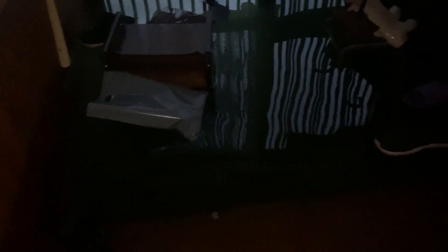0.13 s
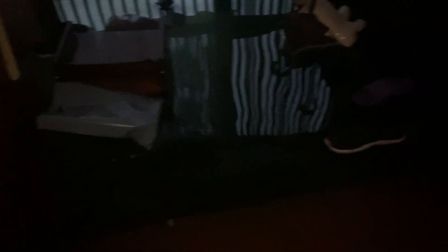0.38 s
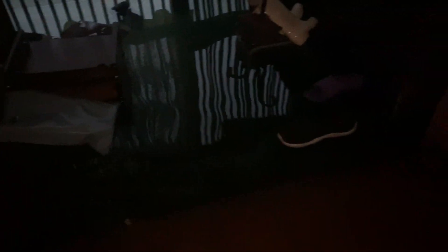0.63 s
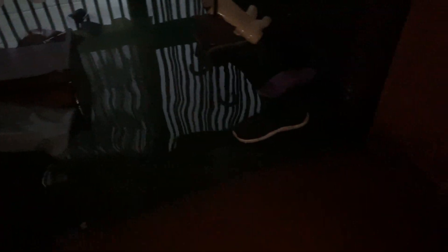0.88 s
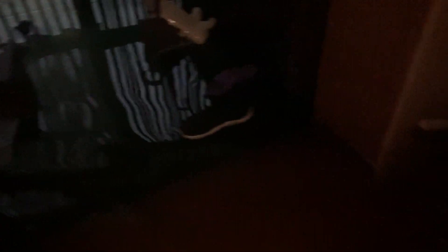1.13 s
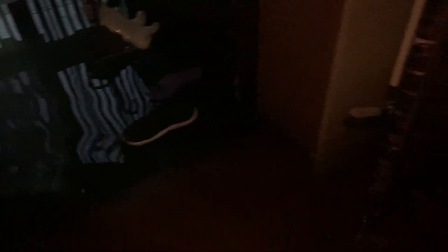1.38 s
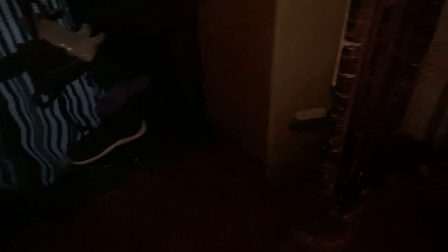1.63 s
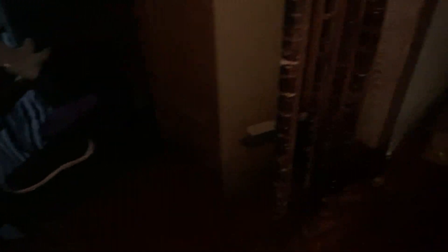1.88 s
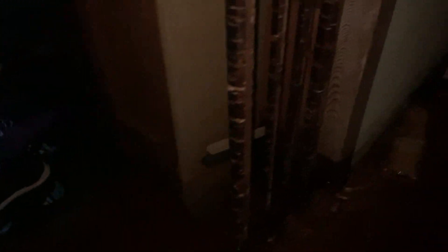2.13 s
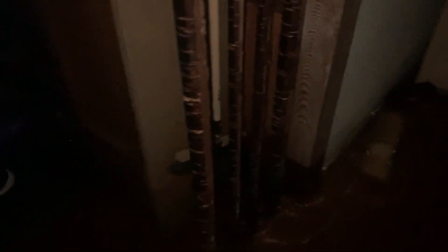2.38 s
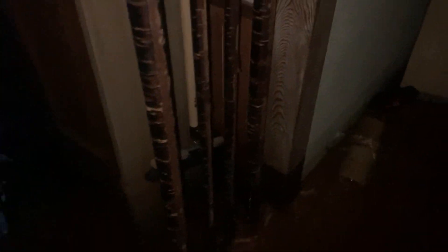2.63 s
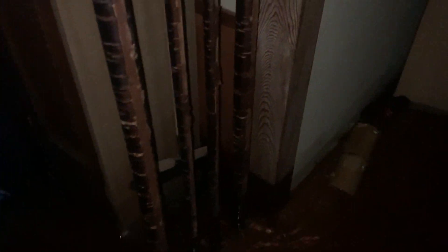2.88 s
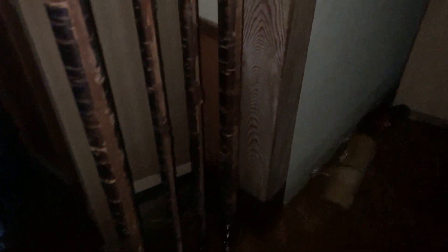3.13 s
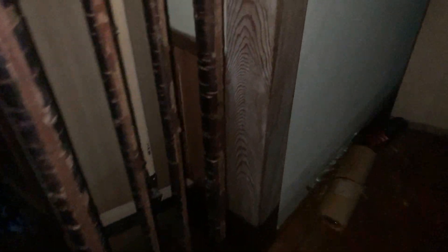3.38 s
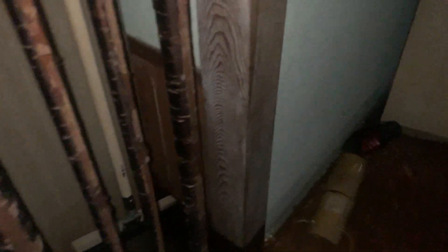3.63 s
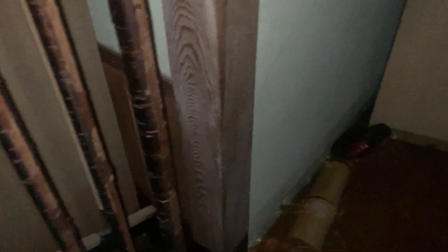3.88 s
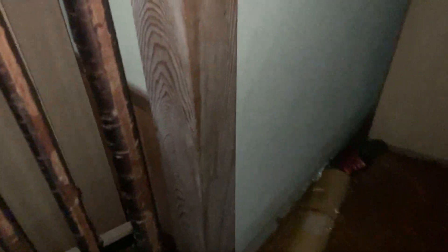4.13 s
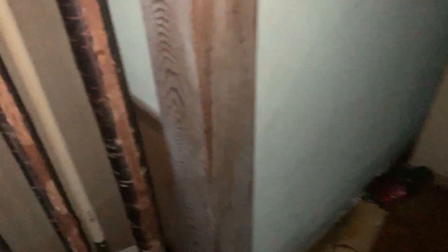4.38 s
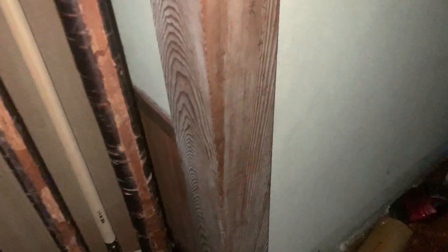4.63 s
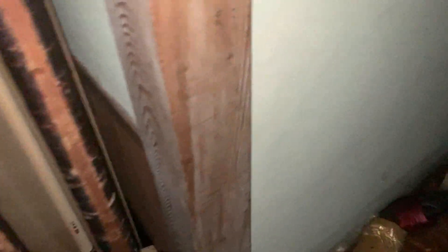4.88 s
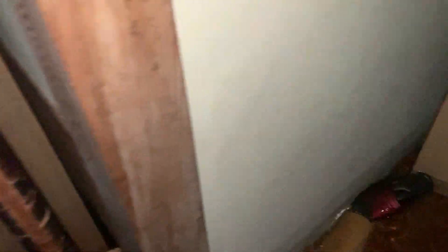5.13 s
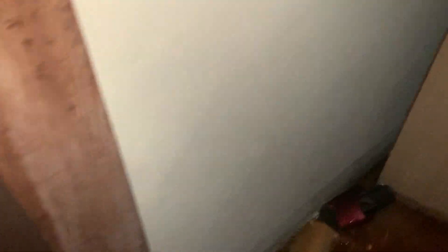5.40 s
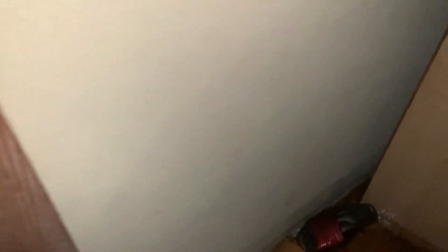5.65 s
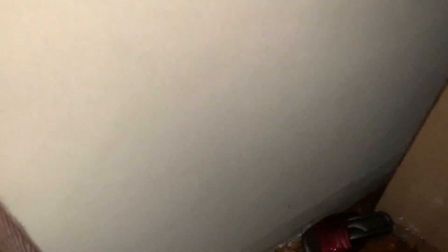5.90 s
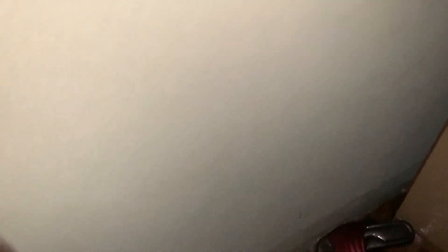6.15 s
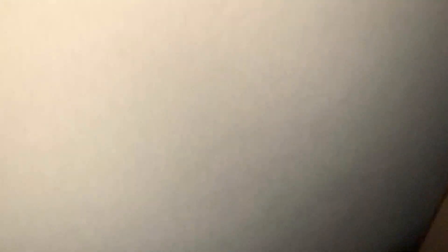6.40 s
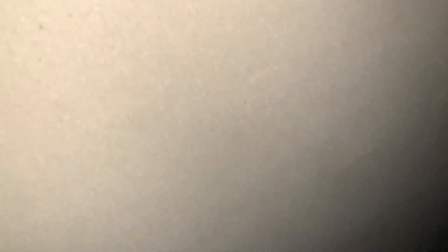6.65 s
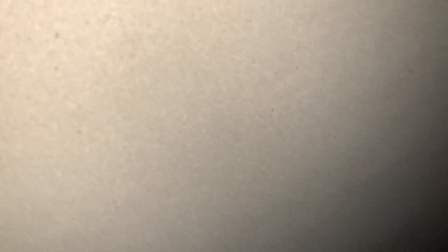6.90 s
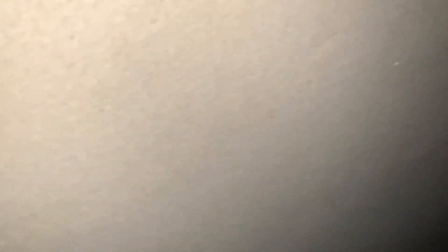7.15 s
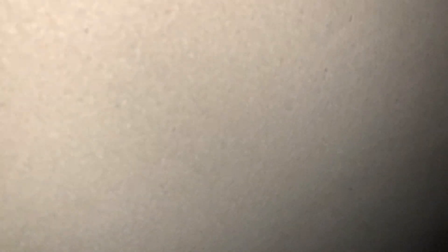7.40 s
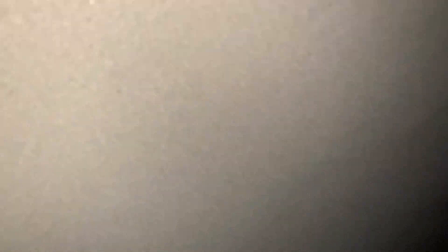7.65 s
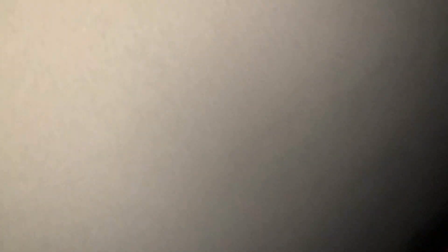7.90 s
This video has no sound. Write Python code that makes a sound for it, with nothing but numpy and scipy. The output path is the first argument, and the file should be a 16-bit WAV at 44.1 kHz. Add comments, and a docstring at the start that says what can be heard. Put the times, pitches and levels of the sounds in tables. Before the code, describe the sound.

Irregular sloshes, bubbly gurgles and drips in a small flooded wooden house, ending in booming thumps and a low stuttering door groan.

```python
"""Heard first: someone wading through a flooded room; each stride pushes a surge that gurgles and throws spray.
Surges are swelling noise and swarms of damped sines; big bubbles, drops and slaps ring out singly.
Footfalls and knocks boom through the wooden house as falling tones and noise through its resonances.
At the end a swollen door is knocked and judders open, a stack of overtones on its stick-slip rate.
Two close microphone ports hear the bubbles and drops mostly through the room's echo."""
import sys
import numpy as np
from scipy import signal
from scipy.fft import rfft, irfft, next_fast_len
from scipy.io import wavfile
from scipy.ndimage import uniform_filter1d, map_coordinates

SR = 44100
rng = np.random.default_rng(int(sys.argv[2]) if len(sys.argv) > 2 else 0)


def attenuation_scalar(level_db):
    """Turn a level in dB into a linear amplitude multiplier (20 dB per decade)."""
    decades = np.asarray(level_db, float) / 20
    return 10 ** decades


def unload_audio(sound):
    """Save the sound as a 16-bit wav file, at the path given as the first command line argument."""
    columns = np.transpose(np.atleast_2d(sound))
    # keep every value between -1 and 1, then stretch to whole-number steps
    steps = np.round(np.clip(columns, -1, 1) * 32767)
    wavfile.write(sys.argv[1], SR, steps.astype(np.int16))


N = 353902  # length in samples

# Hush of the still room, spectrum before it is scaled to rms 1: f/Hz, relative density/dB per Hz
HUSH_SPECTRUM = [(15, -14), (25, 11), (66, 14.5), (280, 14), (607, 7), (1260, -23.5), (8360, -14.5),
                 (9570, 0), (11000, -8), (15000, -7.5), (16000, -73)]
HUSH_DB = -71  # rms
# Echo of the room: f/Hz, T60/s
ROOM_T60 = [(60, 0.97), (500, 0.23), (1700, 0.34), (3500, 0.17), (15000, 0.073)]
# Correlation of the two ports in spread-out sound: f/Hz, left-right correlation (-1 to 1)
PORT_LIKENESS = [(60, 0.47), (130, -0.00099), (290, 0.65), (640, -0.22), (3100, -0.024), (6500, 0.15),
                 (8500, -0.44), (10500, -0.49), (13000, 0.68)]
# Dip of the microphone ports: centre f/Hz, half-width to 1/e of the dip/Hz, level/dB
PORT_NOTCH = (9750, 520, -14)

# Footfalls and knocks: t/s, nominal level/dB, rap level over blow/dB, start of the tone above 55 Hz: f/Hz
THUMPS = [(1.914, -61, -7, 41.5), (2.249, -55, -42, 39.7), (2.859, -56.5, -15, 40),
          (3.263, -49.5, -16, 39.5), (3.992, -39, -47, 92), (4.648, -37, -26.5, 125),
          (5.38, -52, -10, 57.4), (5.791, -34, -55, 120), (6.356, -56, -44, 39.7), (6.448, -41, -43, 81),
          (6.801, -30.5, -21, 146), (6.82, -25, -31, 60), (6.858, -36.5, -19, 58.6),
          (6.978, -45, -17, 60.6), (7.008, -36.5, -43, 39.5), (7.069, -33.5, -11, 306),
          (7.118, -37.5, -36, 61.4), (7.238, -51, -5, 60.2), (7.274, -46.5, -11.5, 59),
          (7.367, -19, -26, 488), (7.447, -40, -41, 103), (7.53, -36, -36, 60.3), (7.609, -30, -33, 81)]
# Resonances of the house frame: f/Hz, width/Hz, level/dB
FRAME_MODES = [(45.4, 10.6, 5), (71.7, 14.6, 4), (94.4, 27.4, -4), (146, 106, -7.5), (188.5, 66.6, -8.5)]
# Resonances of the door panel: f/Hz, width/Hz, level/dB
PANEL_MODES = [(205, 57, 10.5), (393, 46.5, 11), (532, 40, 7.5), (710, 270, -6), (947, 56, -9),
               (1210, 125, -8.5), (2100, 4800, -25)]
MURMUR_DB = -74  # the frame's steady murmur, before its low cut and dulling
SHAKE_T60_S, AFTER_DB, AFTER_T60_S = 0.13, -12.5, 0.94  # the shaking dies fast, a weaker part hangs on
DULL_HZ = 2600  # blows and slaps fade above this

# The sticking door: t/s, slips per second/Hz, nominal level/dB
JUDDER = [(7.7, 66, -44), (7.76, 63, -38), (7.83, 63.3, -35.5), (7.89, 65, -32.5), (7.925, 69, -31),
          (7.955, 76, -30.5), (8.02, 76.5, -30.5)]
# Usual strength of the judder's overtones: f/Hz, relative level/dB
JUDDER_TONE = [(60, 0.5), (130, -15), (200, -13.5), (255, -13), (320, -23), (450, -27.5), (530, -51),
               (660, -41.5), (930, -41), (1100, -50), (1500, -59.5), (1900, -61), (2300, -51),
               (3000, -64.5)]
# Lift of the overtones over their usual strength: t/s, low ones: level/dB, high ones: level/dB
JUDDER_RASP = [(7.7, 6.5, -10), (7.77, 3, -3.5), (7.83, 0.5, 9), (7.9, -5, 3), (7.96, -2.5, 6.5),
               (8.02, -3.5, -20)]
RASP_HZ = 500  # where the high overtones begin

# Surges pushed by the legs: crest t/s, rise t/s, hold t/s, fall t/s,
# slosh level before layer trims/dB, spray level over slosh before layer trims/dB
SURGES = [(0.065, 0.18, 0.032, 0.68, -47, -35), (0.626, 0.039, 0.021, 0.1, -54.5, -15),
          (0.932, 1, 0.046, 0.52, -49.5, -11), (1.46, 0.099, 0.014, 0.2, -49, 0.5),
          (1.794, 1, 0.019, 0.65, -46, -9), (2.29, 0.013, 0.063, 0.76, -56, -5.5),
          (2.505, 0.57, 0.0069, 0.77, -42, -12), (3.276, 0.81, 0.2, 0.5, -42.5, -14),
          (3.985, 0.46, 0.1, 1, -45.5, -8), (4.535, 1, 0.019, 0.092, -55.5, -4),
          (4.826, 0.34, 0.23, 0.3, -40.5, -6.5), (5.358, 0.95, 0.59, 0.54, -46, -7.5),
          (6.24, 0.76, 0.019, 0.69, -84.5, 23.5), (6.646, 0.34, 0.0061, 0.23, -52.5, -14),
          (6.973, 0.28, 0.027, 0.3, -67.5, 3), (7.068, 0.0034, 0.0082, 0.19, -45.5, -5),
          (7.106, 0.009, 0.013, 0.31, -64.5, 11.5)]
SWING_DB = 58  # a surge climbs and sinks this far over its rise and fall
SPRAY_SINK_DIVISOR = 0.86  # below 1 the spray sinks faster than the slosh
CREST_ROUND = 1.513  # above 1 the fall starts gently and steepens
CALM_SLOSH_DB, CALM_SPRAY_DB = -101, -78.5  # water lapping between surges, before layer trims
# Churning water, before scaling to rms 1: f/Hz, relative density/dB per Hz
SLOSH_SPECTRUM = [(120, -77), (200, -13), (255, -14), (369, -4.5), (483, 0.5), (720, -18), (1140, -1),
                  (1640, -2), (2450, -1.5), (6000, -22), (7800, -85), (13200, -120)]
# Spray mist, before scaling to rms 1: f/Hz, relative density/dB per Hz
SPRAY_SPECTRUM = [(2060, -55.5), (3500, -1), (4290, 0.5), (4870, 0.5), (7000, 0), (8860, 0), (9560, 1),
                  (10900, -2.5), (12700, -4), (15100, -6), (16000, -104)]
# Big bubbles: t/s, peak level before the direct and echo trims/dB, f/Hz
BUBBLES = [(0.023, -24, 1620), (0.027, -38.5, 387), (0.059, -28, 384), (0.058, -32.5, 1905),
           (0.061, -32, 1156), (0.1, -37.5, 378), (0.212, -31.5, 1190), (0.354, -41.5, 2070),
           (0.647, -31.5, 1229), (0.821, -41, 467), (0.901, -40.5, 517), (0.966, -37.5, 1045),
           (1.01, -42.5, 736), (1.136, -44.5, 1033), (1.456, -33.5, 523), (1.459, -37, 880),
           (1.507, -36.5, 2210), (1.701, -42, 1586), (1.71, -44, 734), (1.786, -27.5, 2590),
           (1.82, -39, 733), (1.85, -41, 1050), (2.09, -36.5, 2110), (2.151, -39, 1234),
           (2.153, -39.5, 1770), (2.291, -43, 590), (2.384, -34.5, 837), (2.488, -27.5, 1640),
           (2.529, -36.5, 562), (2.579, -31.5, 592), (2.671, -33, 1640), (2.725, -38.5, 2360),
           (2.747, -45, 1050), (3.149, -37.5, 1015), (3.374, -42, 355), (3.367, -39, 3800),
           (3.529, -30, 616), (3.279, -32, 1410), (3.469, -36, 760), (3.637, -36, 2310),
           (3.655, -35.5, 4580), (3.826, -42, 2670), (3.846, -60.5, 980), (3.947, -36, 1570),
           (3.986, -33, 2600), (4.039, -38.5, 375), (4.428, -36.5, 1505), (4.736, -29.5, 982),
           (4.785, -27.5, 640), (4.85, -34, 1590), (4.864, -27.5, 840), (5.02, -23.5, 700),
           (5.058, -20, 733), (5.2, -32.5, 1640), (5.317, -29.5, 2300), (5.456, -33, 1150),
           (5.43, -33.5, 800), (5.505, -28.5, 2010), (5.67, -36, 618), (5.599, -37.5, 534),
           (5.786, -24.5, 2000), (5.925, -24.5, 805), (5.979, -29.5, 2070), (6.059, -39, 733),
           (6.281, -48, 1540), (6.613, -35, 1680), (6.653, -36, 2830), (6.981, -40, 568),
           (6.981, -48.5, 1060), (6.981, -48, 2400)]
# Bursting spray drops: t/s, peak level before the direct and echo trims/dB, f/Hz
DROPS = [(0.173, -39.5, 12100), (0.596, -43.5, 11700), (0.678, -46, 6260), (0.9654, -44, 5900),
         (1.4037, -41.5, 11700), (1.444, -36.5, 6600), (1.7275, -36, 6440), (2.2927, -38.5, 6100),
         (2.5268, -36, 6300), (3.609, -36, 14540), (3.899, -32, 11600), (4.148, -33, 13000),
         (4.432, -31.5, 7200), (4.5502, -24, 14300), (4.7013, -36, 11600), (4.8482, -29.5, 7250),
         (5.01, -21.5, 8250), (5.652, -36, 7700), (5.9444, -29.5, 8150), (6.044, -29.5, 10600),
         (6.118, -27.5, 10040), (6.2617, -35, 13200), (6.278, -38, 7540), (6.4968, -36.5, 8940),
         (6.599, -36.5, 11700), (6.655, -42, 13500), (6.732, -40.5, 12400), (7.1074, -15, 12100),
         (7.2924, -42, 15000), (7.6094, -50, 14900)]
# Water slapping leg and wall: t/s, level before filtering and mixing/dB
SLAPS = [(0.059, -31.5), (1.456, -39.5), (1.786, -41.5), (2.485, -50), (3.246, -38), (7.072, -32)]
# The wader stands mostly off to the left: f/Hz, left over right level/dB
LEAN = [(200, 2.5), (700, 3.5), (4400, 6), (8000, 1), (15000, -1)]
# Direct water sound: f/Hz, phase lead of the left port/rad (negative: it lags)
LEAD = [(5000, 0), (9000, -3), (13000, 0)]


def unit(x):
    """Scaled to rms 1."""
    return x / np.sqrt(np.mean(x ** 2) + 1e-20)


def along(points, hz):
    """Reads (Hz, value) points along a log frequency axis."""
    f, value = np.transpose(points)
    return np.interp(np.log(hz + 1), np.log(f + 1), value)


def curves(rows):
    """One value per sample for each column after the time."""
    s, *columns = np.transpose(rows)
    return [np.interp(np.arange(N) / SR, s, column) for column in columns]


def wobble(rate):
    """A smooth random curve, rate knots a second, 40 at most."""
    knots = rng.standard_normal(int(N * 40 / SR) + 4)
    return map_coordinates(knots, [np.arange(N) * min(rate, 40) / SR])


def filtered(x, response):
    """x times a complex response of frequency."""
    size = next_fast_len(N + SR // 2)
    hz = np.fft.rfftfreq(size, 1 / SR)
    return irfft(rfft(x, size) * response(hz), size)[..., :N]


def resonant(x, modes):
    """x through parallel band-pass resonances of alternating sign."""
    def response(f):
        total = 0
        for k, (centre, width, db) in enumerate(modes):
            damping = 1j * f * width
            total = total + (-1) ** k * attenuation_scalar(db) * damping / (centre * centre - f * f + damping)
        return total
    return filtered(x, response)


def dull(hz):
    """Causal steep low-pass: soft contacts carry no treble."""
    return 1 / (1 - (hz / DULL_HZ) ** 2 + 1j * hz / DULL_HZ) ** 2


def left_right(points):
    """Halves of a left-right difference, plus for the left port and minus for the right."""
    return lambda hz: along(points, hz) * np.array([[0.5], [-0.5]])


def ports(pair):
    """Blends two unrelated sounds to the left-right correlation of the microphone ports."""
    def mid_side(hz):
        angle = np.arccos(np.clip(along(PORT_LIKENESS, hz), -1, 1)) / 2
        return np.array([np.cos(angle), np.sin(angle)])
    mid, side = filtered(pair, mid_side)
    return np.array([mid + side, mid - side])


def rush(spectrum, patchy_db):
    """Stereo noise of rms 1 with patches of random gain in time and frequency."""
    z = signal.stft(rng.standard_normal((2, N)), nperseg=512)[2]
    field = uniform_filter1d(rng.standard_normal(z.shape[1:]), size=4, axis=0)
    field = uniform_filter1d(field, size=6, axis=1)
    pair = signal.istft(z * attenuation_scalar(patchy_db * unit(field)), nperseg=512)[1][:, :N]
    return unit(ports(filtered(pair, lambda hz: attenuation_scalar(along(spectrum, hz)))))


def hush():
    """The still room: steady noise of the room's own colour."""
    return attenuation_scalar(HUSH_DB) * rush(HUSH_SPECTRUM, patchy_db=3)


def room(x):
    """The room's echo, each frequency dying at its own speed; a fresh noise tail every quarter second."""
    hop, out = SR // 4, np.zeros((2, N + SR))
    noise = rng.standard_normal((N // hop + 1, 2, SR // 3))
    hz, t, z = signal.stft(noise, SR, nperseg=256)
    decay = attenuation_scalar(-60 * t / along(ROOM_T60, hz)[:, None])
    tails = signal.istft(z * decay, SR, nperseg=256)[1]
    for k, tail in enumerate(tails):
        part = x[None, k * hop:(k + 1) * hop]
        wet = signal.fftconvolve(part, tail / np.linalg.norm(tail[0]), axes=1)
        out[:, k * hop + 150:][:, :wet.shape[1]] += wet  # the echo starts 150 samples late
    return ports(out[:, :N])


def thumps():
    """A blow bends the boards in a falling tone, shakes the frame and, by its hardness, raps the panel."""
    bends, shake, rap = np.zeros((3, N + SR))
    t = np.arange(SR // 2) / SR
    shake_decay = attenuation_scalar(-60 * t / SHAKE_T60_S) + attenuation_scalar(AFTER_DB - 60 * t / AFTER_T60_S)
    shake_shape = shake_decay * (1 - np.exp(-t / 0.011))
    rap_shape = attenuation_scalar(-60 * t / 0.18) + 0.37 * attenuation_scalar(-60 * t / 0.026)
    bend_shape = (1 - np.exp(-t / 0.015)) * np.exp(-t / 0.04)
    for s, db, hard_db, extra_hz in THUMPS:
        noise, at = rng.standard_normal((2, len(t))), round(s * SR)
        sweep = 2 * np.pi * np.cumsum(55 + extra_hz * np.exp(-t / 0.01154)) / SR
        bends[at:][:len(t)] += attenuation_scalar(db - 1.5) * np.sin(sweep) * bend_shape
        shake[at:][:len(t)] += attenuation_scalar(db + 26) * shake_shape * noise[0]
        rap[at:][:len(t)] += attenuation_scalar(db + hard_db + 18.0) * noise[1] * rap_shape
    murmur = unit(resonant(rng.standard_normal(N), FRAME_MODES))
    murmur = attenuation_scalar(MURMUR_DB + 3.5 * wobble(12)) * murmur
    low = bends[:N] + resonant(shake[:N], FRAME_MODES) + murmur
    low = filtered(low, lambda f: 1 / (1 + (38 / (f + 1)) ** 6))  # cut below 38 Hz
    return filtered(low + resonant(rap[:N], PANEL_MODES), dull)


def door():
    """Stick-slip: overtones of a slip rate that slackens, then quickens; the high ones rasp most midway."""
    (rate, db), (low_db, high_db) = curves(JUDDER), curves(JUDDER_RASP)
    since_start = np.arange(N) / SR - JUDDER[0][0]
    phase = 2 * np.pi * np.cumsum(rate * (1 + 0.0081 * wobble(30))) / SR
    stack = 0
    for k in range(1, 44):
        rasp_db = low_db if k * rate.min() < RASP_HZ else high_db
        lift_db = (k > 1) * rasp_db  # the fundamental keeps its level
        flutter_db = min(0.25 * k, 4) * wobble(16)
        level = attenuation_scalar(along(JUDDER_TONE, k * rate) + lift_db + flutter_db)
        drift = 0.12 * max(k - 6, 0) * wobble(40)  # rad
        stack = stack + level * np.sin(k * phase - 0.25 * k * (k - 1) + drift)
    return np.sqrt(2) * attenuation_scalar(db) * np.clip(since_start / 0.0053, 0, 1) * stack


def blips(s, db, hz, t60, rise, size):
    """Damped sines with a soft start whose pitch glides by the share rise over their life."""
    t = np.arange(size) / SR
    hz = np.clip(hz, 100, SR / 2.6)[:, None]
    t60 = np.clip(t60, 0.0003, 0.13)[:, None]
    life = np.minimum(t / t60, 1)
    wave = np.sin(2 * np.pi * np.cumsum(hz * (1 + rise * life), axis=1) / SR)
    wave = wave * attenuation_scalar(db[:, None] - 60 * t / t60) * (1 - np.exp(-t * hz))
    at = (s[:, None] * SR).astype(int) + np.arange(size)
    return np.bincount(at.ravel(), wave.ravel(), N + size + SR)[:N]


def swarm(count, hz, spread, cycles, scatter_db, rise, size):
    """Random bubbles of log-normal pitch, a few louder than the rest; rms 1."""
    pitch = hz * np.exp(spread * np.clip(rng.standard_normal(count), -2, 2))
    db = scatter_db * np.minimum(rng.exponential(size=count), 3)
    db = db - 12 * (pitch < 600)  # big bubbles are quiet in the swarm
    return unit(blips(rng.uniform(0, N / SR, count), db, pitch, cycles / pitch, rise, size))


def spatter(rows, count, spread, late_s, drop_db, cycles, rise):
    """Each burst throws smaller ones, ever weaker, of scattered pitch."""
    s, db, hz = np.repeat(rows, count, axis=0).T
    late, pitch = rng.exponential(size=len(s)), rng.standard_normal(len(s))
    hz = hz * np.exp(spread * pitch)
    return blips(s + late_s * late, db - drop_db - 7 * late, hz, cycles / hz, rise, size=1500)


def big_bubbles():
    """Trapped air rings and climbs in pitch, the small bubbles further; each brings a brood."""
    s, db, hz = np.transpose(BUBBLES)
    big = blips(s, db, hz, 38 / hz + 0.0025, rise=(hz[:, None] / 4500) ** 1.56, size=5800)
    return big + spatter(BUBBLES, count=6, spread=0.1, late_s=0.025, drop_db=9, cycles=20, rise=0.22)


def spray_drops():
    """Drops burst as short high sines sinking slightly in pitch, each with a spatter around it."""
    s, db, hz = np.transpose(DROPS)
    drops = blips(s, db, hz, 40 / hz, rise=-0.028, size=300)
    return drops + spatter(DROPS, count=14, spread=0.11, late_s=0.014, drop_db=5.0, cycles=24.4, rise=0)


def slaps():
    """A sheet of water lands: one sharp pressure step, then a short spatter of noise."""
    out, t = np.zeros(N + SR), np.arange(SR // 4) / SR
    step = 1.3 * np.exp(-t / 0.0001)
    for s, db in SLAPS:
        noise = 0.03 * rng.standard_normal(len(t)) * attenuation_scalar(-60 * t / 0.03)
        out[round(s * SR):][:len(t)] += attenuation_scalar(db) * (step + noise)
    return filtered(resonant(out[:N], [(1600, 2400, 6)]), dull)


def surges():
    """Slosh and spray levels in dB: every surge rises, holds and falls; overlapping ones add in power."""
    t = np.arange(N) / SR
    slosh, spray = attenuation_scalar(CALM_SLOSH_DB) ** 2, attenuation_scalar(CALM_SPRAY_DB) ** 2
    for s, rise, hold, fall, db, spray_db in SURGES:
        before = np.maximum(s - t, 0) / rise
        after = (np.maximum(t - s - hold, 0) / fall) ** CREST_ROUND
        slosh = slosh + attenuation_scalar(db - SWING_DB * (before + after)) ** 2
        spray = spray + attenuation_scalar(db + spray_db - SWING_DB * (before + after / SPRAY_SINK_DIVISOR)) ** 2
    return 10 * np.log10(slosh), 10 * np.log10(spray)


def churn_and_mist(slosh_db, spray_db):
    """Turbulent water and fine spray: patchy noise that follows the surges and laps in common."""
    lap = wobble(14)
    churn = attenuation_scalar(slosh_db - 10 + 1.5 * lap) * rush(SLOSH_SPECTRUM, patchy_db=3.5)
    mist = attenuation_scalar(spray_db - 2.5 + 1.6 * lap + 3.3 * wobble(35)) * rush(SPRAY_SPECTRUM, patchy_db=3.5)
    return churn + mist


def water():
    """Surges drive noise and bubble swarms; bubbles, drops and slaps reach the ports directly and by echo."""
    slosh_db, spray_db = surges()
    gurgle = swarm(count=3600, hz=1300, spread=0.55, cycles=22.4, scatter_db=4, rise=0.25, size=1500)
    gurgle = attenuation_scalar(slosh_db - 5 + 2.73 * wobble(30)) * gurgle
    fizz = swarm(count=1000, hz=9020, spread=0.419, cycles=23, scatter_db=9.5, rise=0.19, size=200)
    fizz = attenuation_scalar(spray_db - 10.0) * fizz
    crackle = swarm(count=3500, hz=3620, spread=0.436, cycles=9.9, scatter_db=5.5, rise=0.1, size=200)
    crackle = attenuation_scalar(slosh_db - 15) * crackle
    slap = slaps()
    low = gurgle + big_bubbles() + slap
    high = fizz + spray_drops() + crackle
    direct = slap + attenuation_scalar(-6.0) * low + attenuation_scalar(-3.5) * high
    direct = filtered(direct, lambda f: np.exp(1j * left_right(LEAD)(f)))
    echo = room(attenuation_scalar(-3.5) * low + attenuation_scalar(1.0) * high)
    both = direct + churn_and_mist(slosh_db, spray_db) + echo
    return filtered(both, lambda f: attenuation_scalar(left_right(LEAN)(f)))


def scene():
    """Hush, wood and water; the lowest tones of the wood come mostly straight through the frame."""
    wood = thumps() + door()
    airborne = filtered(wood, lambda f: 0.2 + 0.8 / (1 + (220 / (f + 1)) ** 4))  # fewer lows below 220 Hz
    return hush() + wood + room(attenuation_scalar(-5) * airborne) + water()


def top_cut(x):
    """Nothing passes above the cut-off."""
    return signal.sosfilt(signal.butter(12, 16510, fs=SR, output="sos"), x)


def record(dry):
    """The microphone ports dip at one high frequency; nothing passes from 16 kHz up."""
    hz, width, db = PORT_NOTCH
    mix = filtered(dry, lambda f: attenuation_scalar(db * np.exp(-((f - hz) / width) ** 2)) * (f < 16000))
    return top_cut(mix)


dry = scene()
out = record(dry)
unload_audio(out)
```